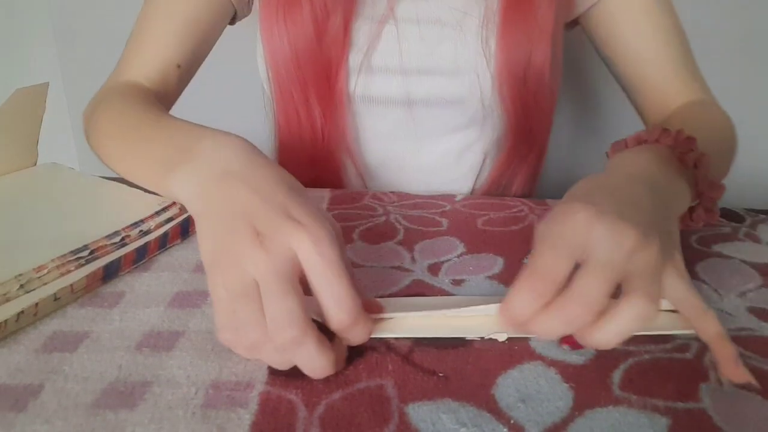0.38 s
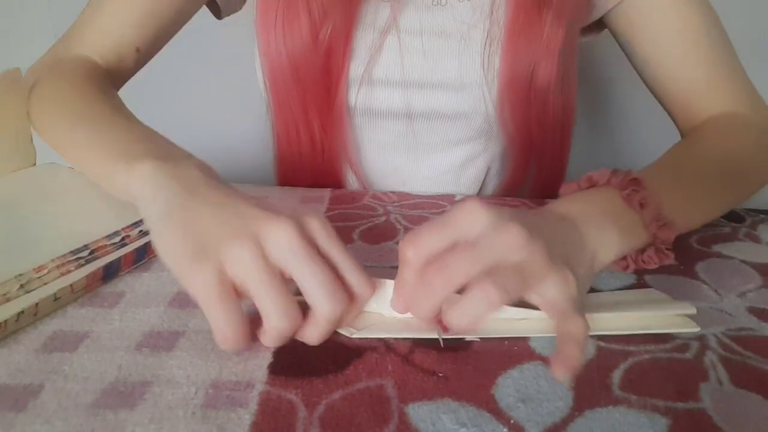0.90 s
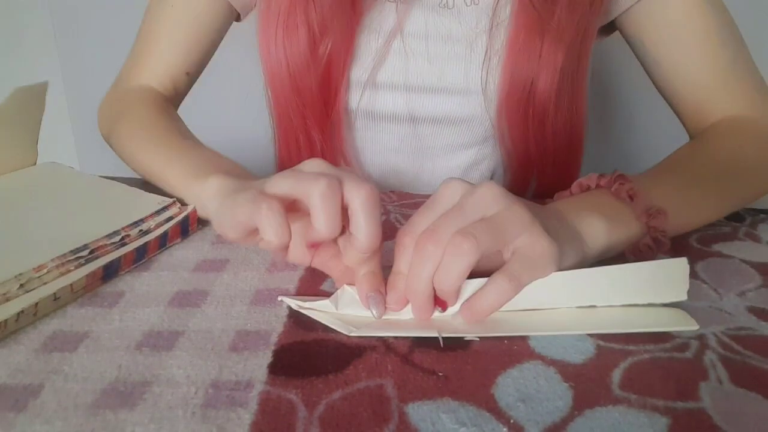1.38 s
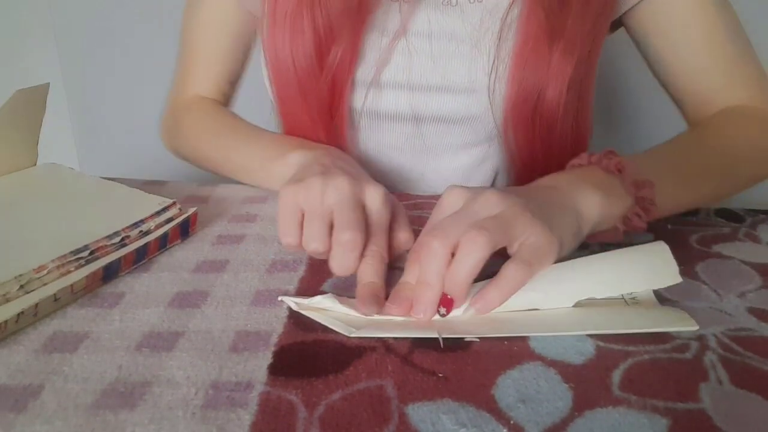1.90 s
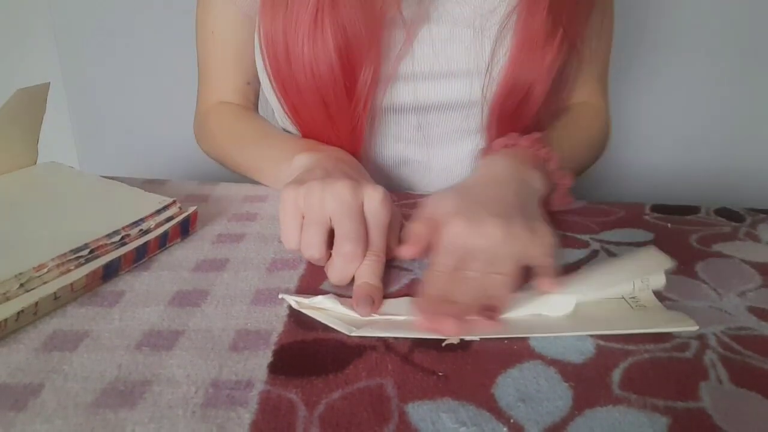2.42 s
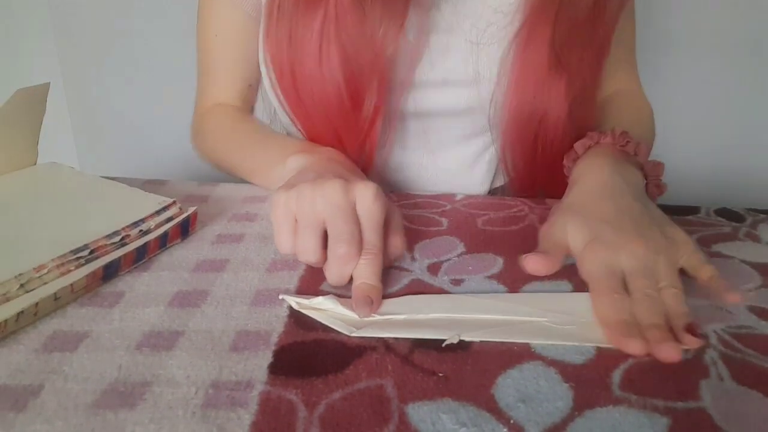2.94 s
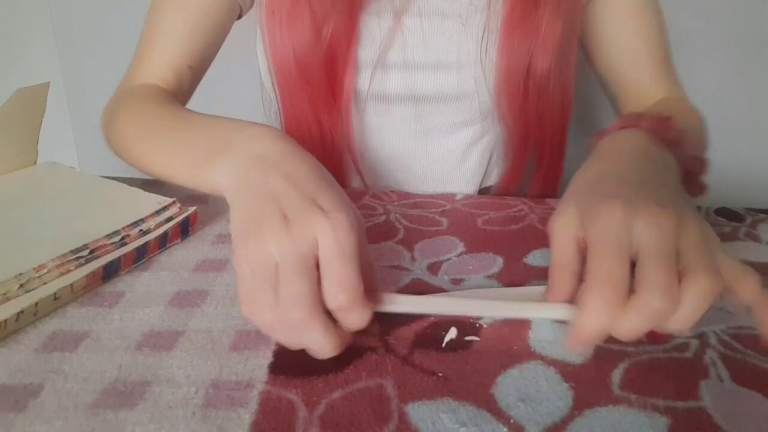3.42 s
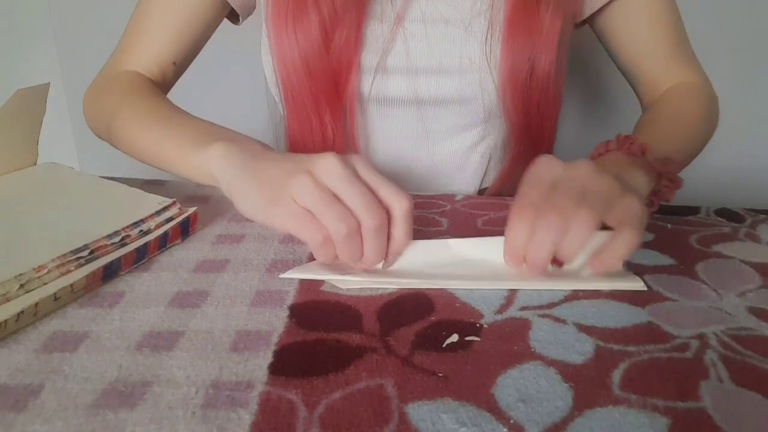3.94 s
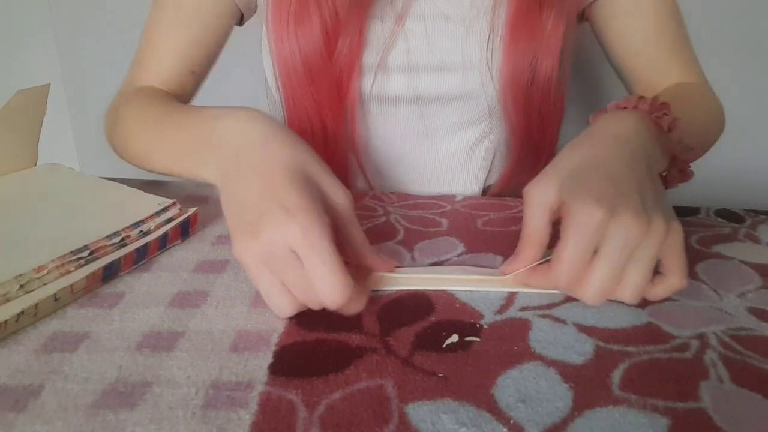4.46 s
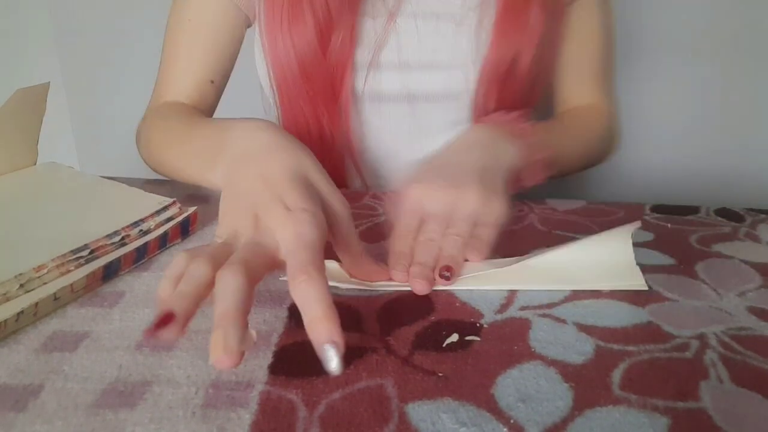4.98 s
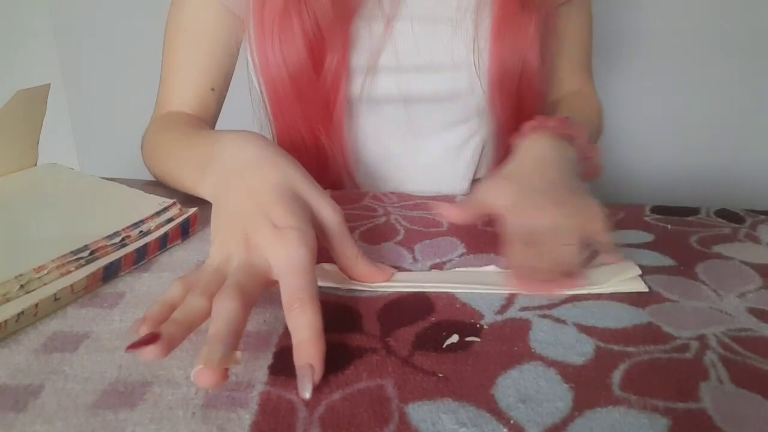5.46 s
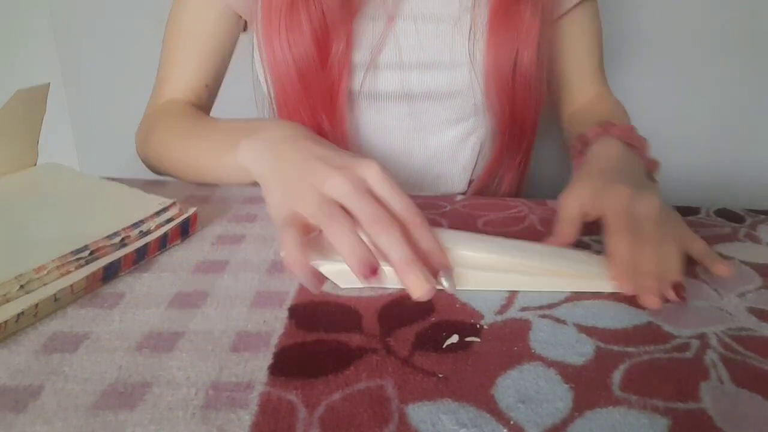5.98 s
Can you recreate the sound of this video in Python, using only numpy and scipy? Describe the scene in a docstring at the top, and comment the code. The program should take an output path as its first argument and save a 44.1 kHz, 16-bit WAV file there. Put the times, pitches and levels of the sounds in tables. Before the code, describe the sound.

Close, dry crinkling of a stiff sheet: bright pops, raspy rubbing along creases, loose-edge flutter and dull table bumps in a small quiet room.

```python
"""Folding stiff paper

Two hands fold and crease a stiff sheet on a cloth-covered table, close to a small stereo microphone.
Buckling facets snap and crackle as short rings with sharp ticks; knuckles thud as low, dying table tones.
Fingers, sheet and cloth hiss, rasp, flutter and rustle as coloured, grainy noise.
A small room answers with a fading noise echo, over a low noise rumble and a faint, swelling hum."""
import sys
import numpy as np
from scipy import signal
from scipy.fft import rfft, irfft
from scipy.io import wavfile
from scipy.ndimage import uniform_filter1d

SR = 44100
rng = np.random.default_rng(int(sys.argv[2]) if len(sys.argv) > 2 else 0)


def linear_from_db(decibels):
    """Turn decibels (scalar or array-like) into linear amplitude factors; 0 gives 1."""
    return 10 ** (np.asarray(decibels, float) / 20)


def to_wav(s):
    """Save 16-bit WAV."""
    ch = np.atleast_2d(s).T  # columns
    pcm = np.round(np.clip(ch, -1, 1) * 32767)  # PCM
    wavfile.write(sys.argv[1], SR, pcm.astype(np.int16))


N = 269876
TIME = np.arange(N) / SR
COARSE_TIME = TIME[::32]  # slow gains are worked out only this often
RIGHT_LAG_S = 0.0001
LEFT_DB = 6.5  # left minus right, for sounds that do not follow the hands


def on_log(hz, table):
    """Read a (frequency, value) table on a log-frequency axis."""
    f, value = np.transpose(table)
    return np.interp(np.log(hz + 1), np.log(f), value)


def unit(x):
    """Scale to rms 1."""
    return x / np.sqrt(np.mean(x ** 2))


def walk(rate):
    """A random wavering of rms 1: about `rate` new levels a second, joined by straight slopes."""
    hold = int(SR / rate)
    levels = np.repeat(rng.standard_normal(N // hold + 1), hold)
    return unit(uniform_filter1d(levels, hold)[:N])


def sides(db):
    """Left and right gains for a level difference; their mean is 1."""
    left = 2 / (1 + linear_from_db(-np.asarray(db)))
    return np.array([left, 2 - left])


# Where the hands are, from side to side: (time [s], left minus right [dB])
HAND_PLACES = [(0.0, 5), (0.12, 9), (0.54, 5), (1.02, 7.5), (2.69, 3.5), (3.26, 8), (3.99, 3.5),
               (4.04, 6.5), (5.61, 2.5), (5.86, 8), (6.09, 4.5), (6.12, 6.5)]


def hands(s):
    """Left and right gains for a sound made where the hands are at time s."""
    return sides(np.interp(s, *np.transpose(HAND_PLACES)))


def swell(peak_s, rise_s, fall_s):
    """Gain over coarse time of each gesture (one a row): a rounded rise to 1 and a rounded fall."""
    drop_db = 26  # softer by this much one rise before or one fall after the peak
    rise_bend, fall_bend = 1.47, 1.39  # roundness of either side of the top
    late = COARSE_TIME - np.asarray(peak_s)[:, None]
    before = -late / np.maximum(rise_s, 0.01)[:, None]
    after = late / np.maximum(fall_s, 0.01)[:, None]
    away = np.where(late < 0, before, after)
    return linear_from_db(-drop_db * np.minimum(away, 4) ** np.where(late < 0, rise_bend, fall_bend))


def every_sample(gain):
    """Fill in a coarse gain at every sample."""
    return np.interp(TIME, COARSE_TIME, gain)


# How alike noise is left and right: (frequency [Hz], likeness [0-1])
SIDE_LIKENESS = [(60, 0.54), (300, 0.6), (1000, 0.48), (2500, .6), (4500, 0.18), (16000, 0.1)]


def grain(colour, rate, scatter_db, smooth):
    """Tiny slips of very unequal size, `rate` a second, over a smooth hiss, coloured and spread in stereo."""
    slips = (rng.random(N) < rate / SR) * linear_from_db(scatter_db * rng.exponential(size=N))
    gate = smooth + unit(signal.lfilter([1], [1, -0.96], slips))  # each slip dies away quickly
    hz = np.fft.rfftfreq(N, 1 / SR)
    like = np.clip(on_log(hz, SIDE_LIKENESS), 0, 1)
    mid, side = rfft(gate * rng.standard_normal((2, N))) * linear_from_db(on_log(hz, colour))
    mid = irfft(mid * np.sqrt(1 + like), N)
    side = irfft(side * np.sqrt(1 - like), N)
    right = np.roll(mid - side, int(RIGHT_LAG_S * SR))  # the right port lies a little further off
    return np.array([mid + side, right]) / np.sqrt(np.mean(mid ** 2))


def ring(t, hz, modes, decay_s, rise_s, chance):
    """Short modes on hz, a little detuned at each blow; one blow a row, each with peak 1."""
    multiple, db = np.transpose(modes)[:, :, None]
    f = hz[:, None, None] * multiple * np.exp(0.04 * chance[:, :, None])
    fading = linear_from_db(db) * np.exp(-t * multiple / decay_s)  # higher modes die sooner
    wave = (fading * np.sin(2 * np.pi * f * t)).sum(axis=1)
    wave = wave * (1 - np.exp(-t / rise_s))
    return wave / np.abs(wave).max(axis=1, keepdims=True)


def place(times, waves):
    """Lay stereo waves (events, 2, samples) out in time."""
    length = waves.shape[2]
    out = np.zeros((2, N + length))
    for s, wave in zip(times, waves):
        start = int(s * SR)
        out[:, start:start + length] += wave
    return out[:, :N]


# Swells of the hum: (time of peak [s], rise [s], fall [s], pitch [Hz], level [dB])
HUM_SWELLS = [(.086, .15, 0.17, 135.5, -55), (.284, 0.094, .2, 138, -54), (1.83, 0.25, 0.48, 157, -55),
              (2.26, 0.33, 0.2, 161, -57.5), (2.58, 0.17, 0.35, 159, -48.5)]


def hum():
    """A soft sine tone that swells now and then, its pitch drifting from swell to swell."""
    s, rise, fall, hz, db = np.transpose(HUM_SWELLS)
    gain = every_sample(linear_from_db(db) @ swell(s, rise, fall))
    pitch = np.interp(TIME, s, hz) * (1 + 0.013 * walk(8))
    phase = 2 * np.pi * np.cumsum(pitch) / SR
    return np.sqrt(2) * gain * np.sin(phase)


# Colour of the room's rumble and air: (frequency [Hz], relative noise level [dB])
ROOM_COLOUR = [(21, -27.5), (35, 3.5), (322, -10), (484, -13.5), (536, -20), (1270, -25.5), (1920, -32),
               (3500, -30.5), (5050, -33), (7790, -18.5), (9310, -28), (14400, -28.5), (15500, -37)]


def background():
    """Rumble and air of the room as noise that wavers a little, with the hum."""
    room_db = -55
    air = linear_from_db(room_db + 0.43 * walk(5.7)) * grain(ROOM_COLOUR, 100, 0.86, 4.7)
    return (air + hum()) * sides(LEFT_DB)[:, None]


def walls(x):
    """Diffuse echo that starts after the trip to the walls and back, duller than the direct sound."""
    t60_s, echo_db, gap_s, top_hz = 0.26, -14, 0.008, 7000
    t = np.arange(int(0.45 * SR)) / SR
    fading = np.exp(-np.log(1000) * t / t60_s)  # falls by 60 dB in t60_s
    opening = np.clip(t / gap_s - 0.5, 0, 1)  # silent for half the gap, full at one and a half
    tail = rng.standard_normal((2, len(t))) * fading * opening
    tail = signal.lfilter(*signal.butter(3, top_hz, fs=SR), tail)
    tail = unit(tail) / np.sqrt(len(t))
    echo = signal.fftconvolve(x.mean(axis=0, keepdims=True), tail, axes=1)[:, :N]
    return linear_from_db(echo_db) * echo * sides(LEFT_DB)[:, None]


# A palm or sleeve brushes the cloth: (time of peak [s], rise [s], fall [s], level [dB])
CLOTH_BRUSHES = [(1.85, .03, .06, -54), (2.51, 0.037, 0.074, -50), (2.94, 0.039, 0.088, -49),
                 (3.035, 0.018, 0.052, -51.5), (5.59, .04, .1, -57), (5.845, .03, 0.12, -51.5),
                 (5.9, 0.028, .06, -65)]
# Colour of the cloth's rustle: (frequency [Hz], relative noise level [dB])
CLOTH_COLOUR = [(150, -30), (260, -3.5), (420, 0.5), (600, -5), (750, -23), (1100, -43)]


def brushes():
    """Soft, dull rustles of the tablecloth: grainy low noise that swells with each brush."""
    s, rise, fall, db = np.transpose(CLOTH_BRUSHES)
    gain = every_sample(linear_from_db(db) @ swell(s, rise, fall))
    return gain * grain(CLOTH_COLOUR, 91, 1.5, 2.6) * hands(TIME)


# Knuckles and wrists on the table: (time [s], peak level [dB], ring pitch [Hz])
TABLE_THUDS = [(0.806, -45, 157), (1.498, -44, 114), (2.103, -40, 117), (2.468, -40, 140),
               (2.504, -36.5, 124), (3.024, -42, 217), (3.286, -42.5, 117), (3.727, -42, 220),
               (3.903, -50, 258), (4.487, -24, 99), (4.515, -22, 85.3), (4.545, -24, 98.4),
               (4.736, -39, 105.5), (4.868, -31, 92), (4.896, -37, 105), (5.273, -39.5, 101),
               (5.308, -46, 243), (5.97, -25, 165), (5.985, -33.5, 84), (6.01, -35.5, 230)]
# Modes of the table top: (multiple of ring pitch [-], relative level [dB])
TABLE_MODES = [(1, -1), (1.7, -5), (2.6, -2), (3.6, -2), (4.999, 1)]


def thuds():
    """Soft blows ring the table top for a few cycles."""
    s, peak_db, hz = np.transpose(TABLE_THUDS)
    t = np.arange(4096) / SR
    chance = rng.standard_normal((len(s), len(TABLE_MODES)))
    note = ring(t, hz, TABLE_MODES, 0.013, 0.0099, chance) * linear_from_db(peak_db)[:, None]
    return place(s - 0.003, note[:, None] * sides(LEFT_DB)[:, None])


# Strokes of the hands over the sheet:
# (time of peak [s], rise [s], fall [s], skin hiss level [dB], sheet rasp level [dB], flutter level [dB])
HAND_STROKES = [(.06, 0.36, 0.24, -45, -52.5, -58.5), (.19, 0.058, 0.073, -44, -42, -50.5),
                (.34, 0.39, 0.34, -51.5, -54, -58.5), (.43, 0.13, 0.07, -45, -48, -56),
                (.5, 0.083, .25, -36, -35.5, -53.5), (.65, 0.33, 0.19, -38.5, -45.5, -51.5),
                (.75, 0.19, .14, -39.5, -42, -57), (.82, 0.028, 0.11, -48, -43, -41.5),
                (.9, .05, 0.16, -42, -49, -63), (.99, 0.15, 0.2, -43.5, -44, -65),
                (1.13, 0.083, .1, -56, -65, -67), (1.271, 0.17, 0.12, -44.5, -45.5, -61),
                (1.40, 0.21, 0.27, -50, -52, -64), (1.47, 0.088, 0.052, -39, -47, -65.5),
                (1.515, 0.047, 0.13, -40.5, -34, -49), (1.71, 0.071, 0.048, -45, -48.5, -66.5),
                (1.739, 0.057, 0.22, -42.5, -40, -58.5), (1.902, 0.069, 0.047, -30.5, -46.5, -53),
                (1.96, 0.088, 0.27, -40, -48, -59.5), (2.114, 0.029, 0.094, -36, -33, -39.5),
                (2.22, 0.13, 0.077, -35.5, -37, -46.5), (2.35, 0.21, 0.12, -58, -48, -69),
                (2.48, 0.15, 0.28, -27, -38, -58), (2.581, 0.19, 0.17, -30.5, -54, -50.5),
                (2.90, .09, 0.1, -45, -64, -63), (2.99, .1, 0.15, -56.5, -67, -67),
                (3.079, 0.016, .05, -38, -54.5, -45.5), (3.109, 0.044, 0.11, -40, -41, -48.5),
                (3.23, 0.064, 0.1, -47.5, -52.5, -60), (3.315, 0.11, 0.33, -45.5, -64.5, -63),
                (3.45, 0.049, 0.16, -35, -39.5, -46.5), (3.60, 0.17, 0.064, -41, -38.5, -40),
                (3.70, 0.086, 0.13, -35, -32.5, -31), (3.86, 0.18, 0.15, -37, -31, -40.5),
                (4.061, 0.041, 0.053, -40, -50, -54), (4.12, 0.11, 0.05, -52, -43.5, -60),
                (4.175, 0.037, 0.041, -42.5, -43, -57), (4.233, 0.073, 0.089, -43.5, -43.5, -65.5),
                (4.37, 0.23, .09, -49, -55.5, -74), (4.405, .02, .1, -53, -43, -54.5),
                (4.49, 0.022, 0.043, -41.5, -43.5, -41.5), (4.533, 0.032, 0.082, -35.5, -37.5, -42.5),
                (4.66, .035, .08, -38, -52.5, -57), (4.72, 0.12, 0.079, -35, -39, -50.5),
                (4.926, .16, 0.092, -31, -36, -39.5), (5.05, 0.14, 0.25, -55.5, -69, -66),
                (5.219, 0.036, 0.126, -40, -63, -62), (5.29, 0.11, 0.14, -32, -49.5, -62),
                (5.36, 0.091, 0.21, -28, -39.5, -42.5), (5.469, 0.074, 0.21, -34.5, -50.5, -56.5),
                (5.579, .15, 0.096, -39, -66.5, -62), (5.8, 0.16, 0.32, -66.5, -69, -71),
                (5.941, 0.028, 0.11, -39.5, -46.5, -55), (5.978, .02, 0.088, -34.5, -46, -36),
                (6.06, 0.13, 0.11, -41, -44.5, -53.5)]


def effort():
    """Gains of skin, rasp and flutter over time: the strokes add up in power."""
    s, rise, fall, *levels_db = np.transpose(HAND_STROKES)
    power = swell(s, rise, fall) ** 2
    return [every_sample(np.sqrt(linear_from_db(db) ** 2 @ power)) for db in levels_db]


# Colour of skin sliding on paper: (frequency [Hz], relative noise level [dB])
SKIN_COLOUR = [(1180, -47), (2000, -3), (2250, -3.5), (2650, -1.5), (7610, 2), (9190, -7), (12000, -2.5),
               (14600, -2), (15500, -21)]
# Colour of the rasping sheet: (frequency [Hz], relative noise level [dB])
RASP_COLOUR = [(700, -37), (1050, -6.5), (1350, 0.5), (1800, 0.5), (2400, -1), (3200, -5.5), (6000, -17)]
# Colour of the fluttering edge: (frequency [Hz], relative noise level [dB])
FLUTTER_COLOUR = [(150, -72.5), (280, 0), (400, 0.5), (600, -1.5), (950, -1), (1300, -7), (2400, -30)]


def rubbing(skin, rasp, flutter):
    """Skin hisses on the fibres, the sheet rasps on itself and the cloth, and its loose edge flutters."""
    grip = walk(60)  # the grip of the fingers varies for all layers at once
    skin = skin * linear_from_db(0.8 * grip + 0.97 * walk(45)) * grain(SKIN_COLOUR, 300, 3.9, 5.2)
    rasp = rasp * linear_from_db(1.77 * grip + 1.4 * walk(77)) * grain(RASP_COLOUR, 450, 5.2, 4.2)
    flutter = flutter * linear_from_db(2.8 * grip + 1.9 * walk(51)) * grain(FLUTTER_COLOUR, 150, 1.0, 1.46)
    return (skin + rasp + flutter) * hands(TIME)


def crackles(rasp):
    """Rows for snaps(): many small buckles at random times, louder where the sheet rasps harder."""
    count, over_rasp_db, scatter_db = 160, 2, 2.5
    low_hz, high_hz = 905, 3480
    body_db, tick_db = -14.5, 6.5  # relative to the ring
    when, pitch, size = rng.random((count, 3)).T
    s = 0.01 + when * (TIME[-1] - 0.01)
    rasp_db = 20 * np.log10(rasp[(s * SR).astype(int)])
    db = rasp_db + over_rasp_db - scatter_db * np.log(1 - size)  # a few stand well above the rest
    hz = low_hz * (high_hz / low_hz) ** pitch
    return np.transpose([s, db, hz, np.full(count, body_db), np.full(count, tick_db)])


# Buckling snaps: (time [s], ring peak level [dB], ring pitch [Hz],
# body level over ring [dB], tick level over ring [dB])
SHEET_SNAPS = [(.088, -32.5, 870, -26, -5), (.126, -28.5, 1620, -24, 4), (.1743, -25, 2260, -33, -3),
               (.1873, -22, 1900, -32, -19), (.1953, -24, 1670, -18, -8), (.6327, -25.5, 1470, -10, -17),
               (.6502, -25.5, 814, -5, -7), (.7299, -23.5, 1030, -36, -8), (.747, -24.5, 1890, -31, -15),
               (.8106, -17.5, 1770, -7, -6), (.8651, -12.5, 1580, -46, -9), (1.0438, -32, 2070, -13, -1),
               (1.0622, -32, 1800, -30, -15), (1.18, -37.5, 2460, -16, 3.5), (1.5019, -5, 1710, -33, -5),
               (1.7258, -9, 1766, -25.5, 0), (2.0906, -38, 3200, -20, 19), (2.1047, -12, 1680, -8, 7),
               (2.1423, -29, 1380, -20, -5), (2.2672, -8, 2420, -9, 4), (2.2709, -19, 734, -20, -8),
               (2.47, -17, 2270, -33, 1), (2.5, -13.5, 3060, -23, -6), (2.56, -19, 2460, -6, -2.5),
               (3.0735, -42, 830, -1, 5), (3.0882, -23.5, 1310, -8, -16), (3.103, -26.5, 1480, -16, -15),
               (3.116, -30, 1290, -14, -22), (3.1443, -41, 1650, -23, 13), (3.312, -40.5, 3200, -24, 17),
               (3.4192, -20, 2660, -11, 3), (3.4776, -24.5, 950, -2, 9), (3.4987, -24.5, 1000, 2, -7),
               (3.5862, -28, 1400, 1, -5), (3.6109, -19, 1070, -3, -20), (3.6672, -10.5, 1110, -25, -14),
               (3.674, -13.5, 1820, -23, -31), (3.6919, -12.5, 1270, -32, -5), (3.72, -8, 1660, -11, -8),
               (3.7369, -4, 960, -41, -9), (3.846, -10, 3330, -28, 1), (3.8533, -4, 2050, -15.5, 2),
               (3.909, -7, 890, -17, 4.5), (4.048, -28.5, 1110, -27, 5), (4.0583, -22, 1140, -7, 6.5),
               (4.1064, -28, 1040, -14, -8), (4.1672, -28, 1350, -24, 5), (4.303, -28.5, 4200, -9.5, -1),
               (4.396, -22.5, 3350, -16.5, 1), (4.4835, -38, 830, -8, 5), (4.5249, -27.5, 840, -5, 8),
               (4.6438, -11, 3220, -33, 0.5), (4.6818, -22.5, 1420, -30, 0), (4.7379, -16, 3620, -37, 3.5),
               (4.8162, -24, 1620, -21, -12), (4.9217, -12.5, 1800, -14, -18),
               (4.9266, -14.5, 1490, -21, -3), (4.9366, -14, 994, -11, -6), (5.1482, -43.5, 3400, -12, 13),
               (5.16, -48, 3440, -8, 18), (5.1926, -45.5, 3500, -11, 16.5),
               (5.2122, -35.5, 3300, -22, 17.5), (5.3055, -32, 3530, -19.5, 9),
               (5.311, -17, 1490, -9.5, -3), (5.3282, -13, 3500, -21, 3), (5.3605, -14, 1280, -13.5, -1),
               (5.4312, -23.5, 1100, -10.5, -3), (5.9318, -35, 1490, -24, -1),
               (5.9739, -18.5, 1800, 2, -2.5), (5.9774, -20.5, 826, -9, -4), (6.054, -22, 1330, -12, -16)]
# Modes of a facet: (multiple of ring pitch [-], relative level [dB])
FACET_MODES = [(1, 2.5), (.8, -13.5), (1.3, 0), (1.75, 4), (2.3, -11.5)]
# Modes of the whole sheet: (multiple of body pitch [-], relative level [dB])
BODY_MODES = [(0.602, -2), (1, 16), (1.401, 6.5)]
# Colour of the tick: (frequency [Hz], relative noise level [dB])
TICK_COLOUR = [(800, -19.5), (1800, 4.5), (3000, 7), (4500, 6), (7500, 2.5), (9500, -10), (12500, -2.5),
               (16000, -19.5)]


def snaps(rows):
    """A facet of the sheet flips: a few cycles of ring, a slower body note and a sharp tick."""
    s, peak_db, hz, body_db, tick_db = np.transpose(rows)
    body_hz = np.full(len(s), 604)
    t = np.arange(768) / SR
    facet_chance = rng.standard_normal((len(s), len(FACET_MODES)))
    body_chance = rng.standard_normal((len(s), len(BODY_MODES)))
    facet = ring(t, hz, FACET_MODES, 0.00099, 0.0014, facet_chance)
    body = ring(t, body_hz, BODY_MODES, 0.0033, 0.00019, body_chance)
    note = facet + body * linear_from_db(body_db)[:, None]
    note = np.stack([note, np.roll(note, int(RIGHT_LAG_S * SR), axis=1)], axis=1)

    shared, left, right = rng.standard_normal((3, len(s), len(t)))
    crack = np.stack([shared + 0.21 * left, shared + 0.78 * right], axis=1)  # partly unlike at the two ports
    crack = crack * t * np.exp(-t / 0.00029)
    tick = irfft(rfft(crack) * linear_from_db(on_log(np.fft.rfftfreq(len(t), 1 / SR), TICK_COLOUR)))
    tick = tick / np.abs(tick.mean(axis=1)).max(axis=1)[:, None, None]

    waves = note + tick * linear_from_db(tick_db)[:, None, None]
    gains = (linear_from_db(peak_db) * hands(s)).T[:, :, None]
    return place(s - 0.0005, waves * gains)


def scene():
    """Snaps and thuds stand out enough for the room to be heard after them."""
    skin, rasp, flutter = effort()
    hits = snaps(SHEET_SNAPS) + snaps(crackles(rasp)) + thuds()
    return hits + walls(hits) + rubbing(skin, rasp, flutter) + background() + brushes()


def low_pass(x):
    """Removes everything above the highest recorded frequency."""
    return signal.sosfilt(signal.butter(12, 16430, fs=SR, output="sos"), x)


def record(dry):
    """The microphone passes a limited band, and peaks beyond full scale are clipped."""
    low_cut = signal.butter(3, 40, "high", fs=SR, output="sos")
    high_cut = signal.ellip(8, 0.2, 60, 16300, fs=SR, output="sos")
    heard = signal.sosfilt(np.vstack([low_cut, high_cut]), dry)
    return low_pass(np.clip(heard, -1, 1))


dry = scene()
out = record(dry)
to_wav(out)
```